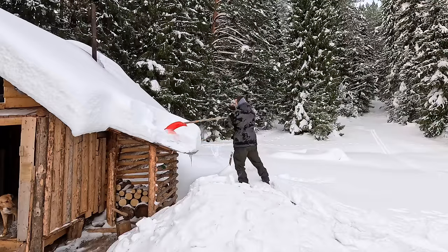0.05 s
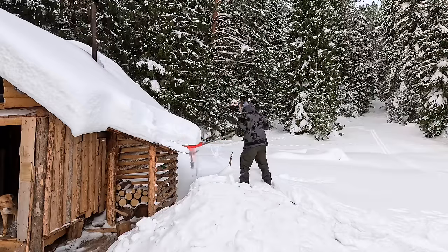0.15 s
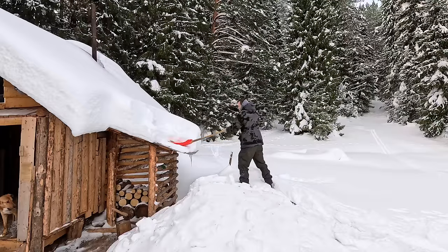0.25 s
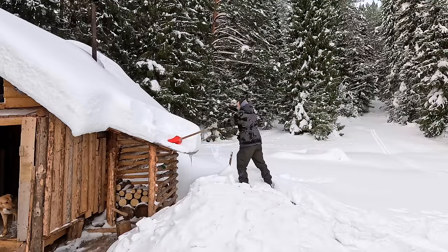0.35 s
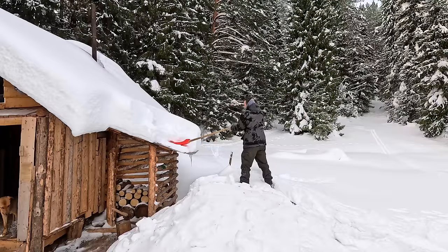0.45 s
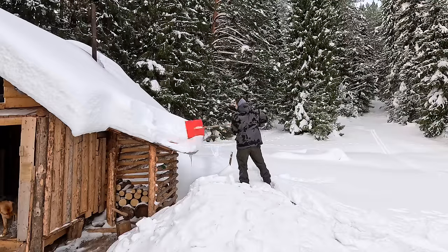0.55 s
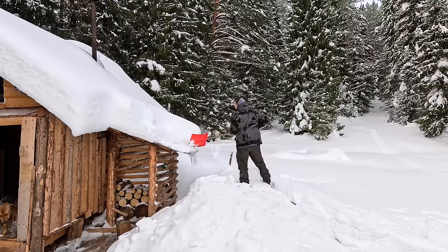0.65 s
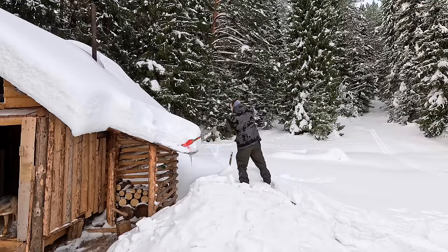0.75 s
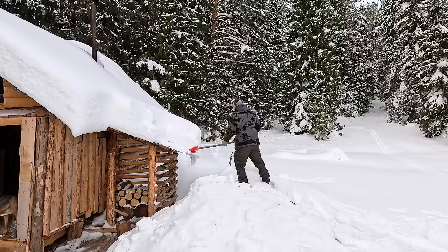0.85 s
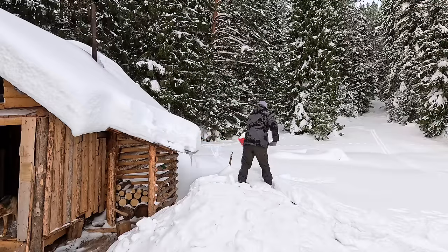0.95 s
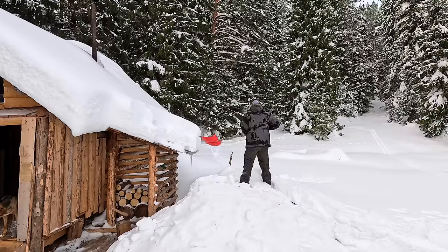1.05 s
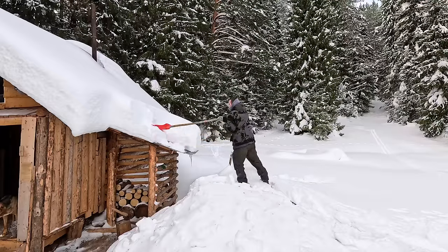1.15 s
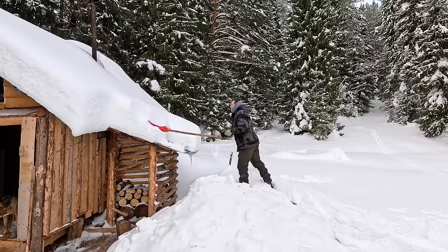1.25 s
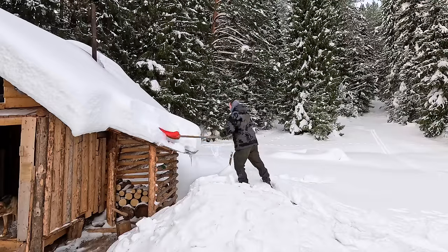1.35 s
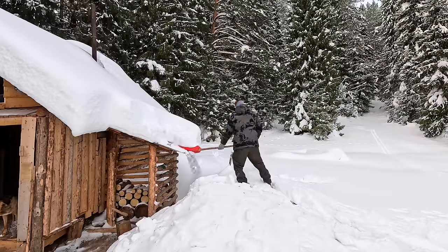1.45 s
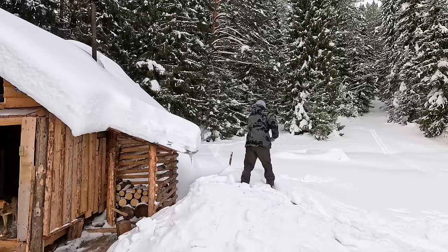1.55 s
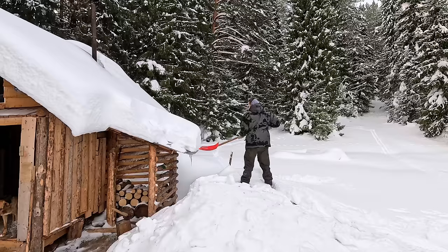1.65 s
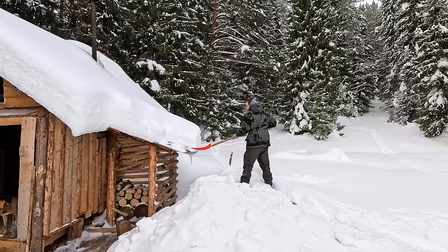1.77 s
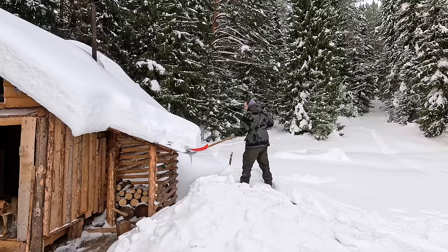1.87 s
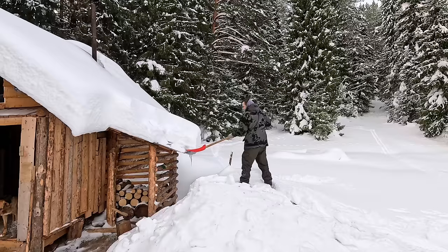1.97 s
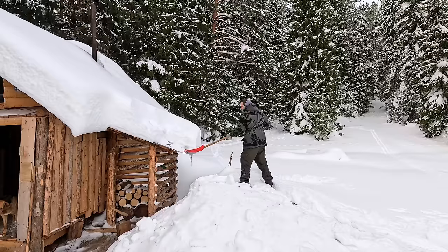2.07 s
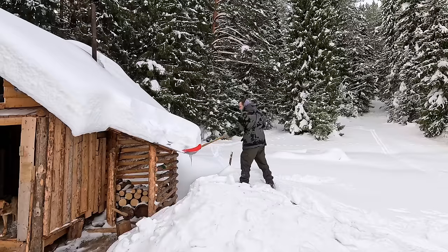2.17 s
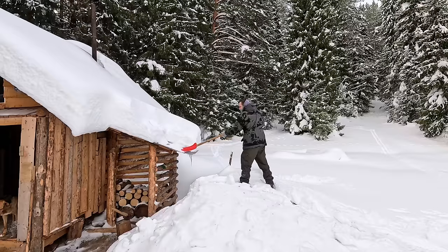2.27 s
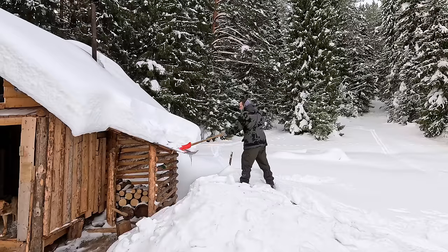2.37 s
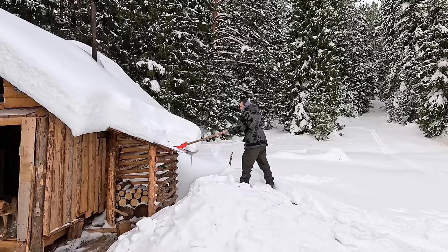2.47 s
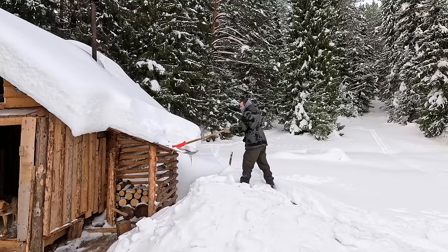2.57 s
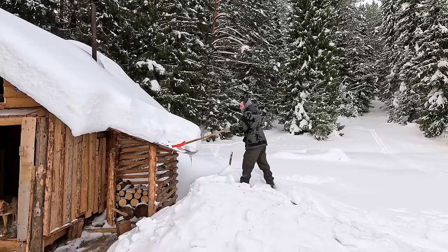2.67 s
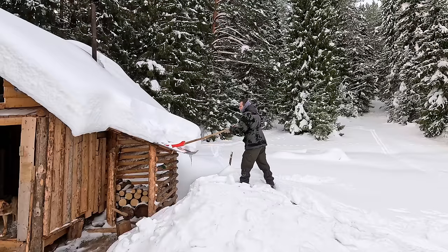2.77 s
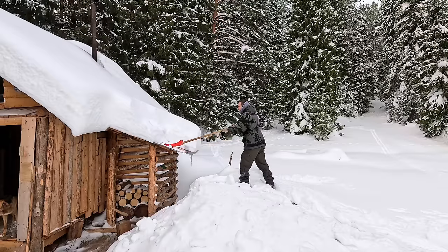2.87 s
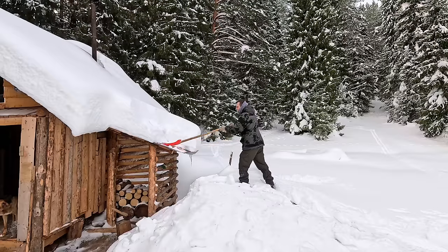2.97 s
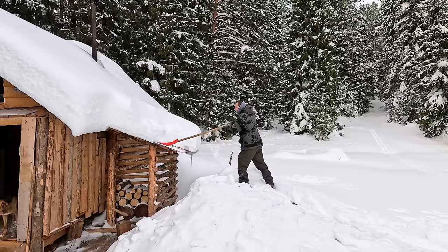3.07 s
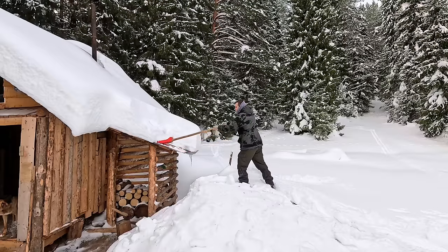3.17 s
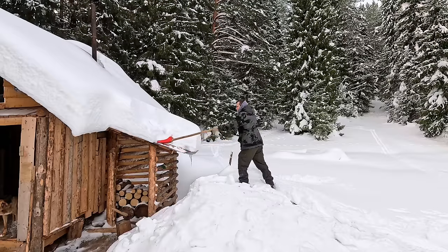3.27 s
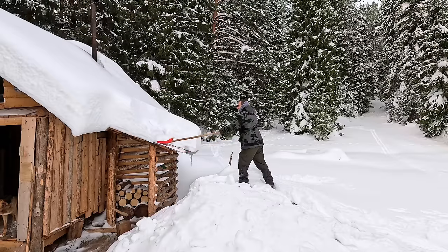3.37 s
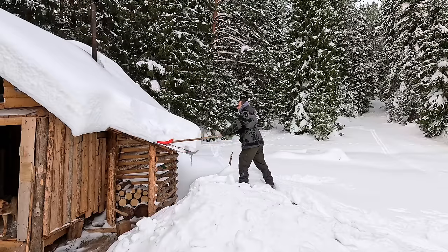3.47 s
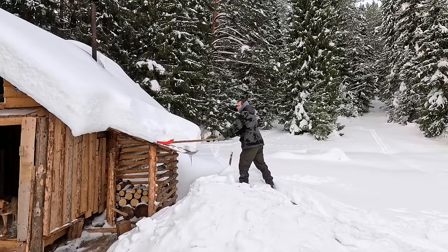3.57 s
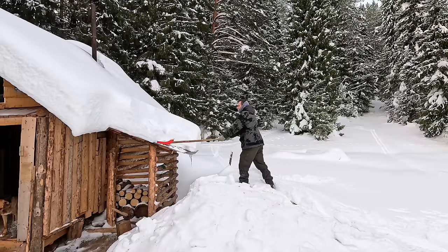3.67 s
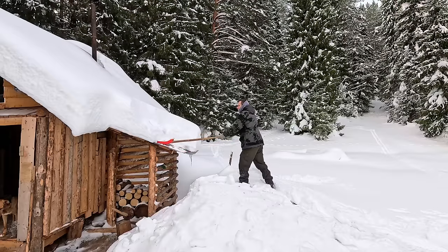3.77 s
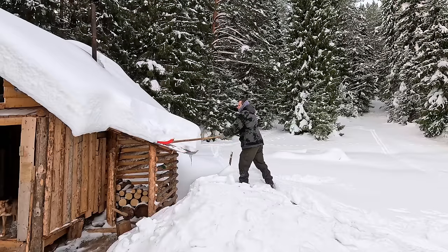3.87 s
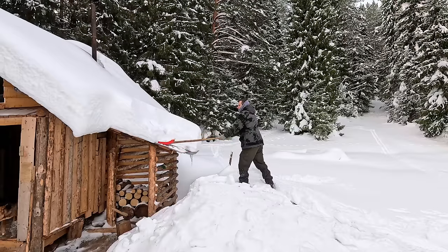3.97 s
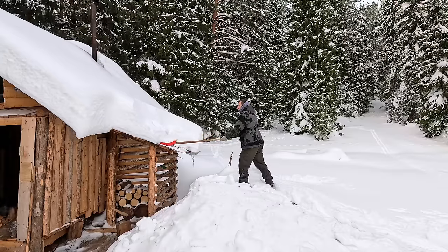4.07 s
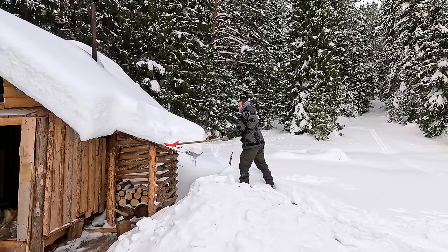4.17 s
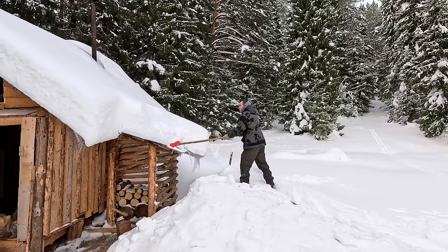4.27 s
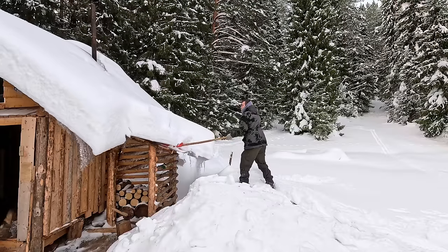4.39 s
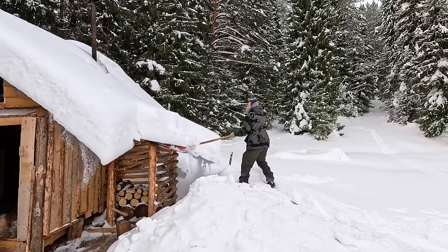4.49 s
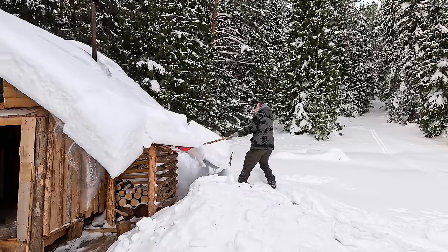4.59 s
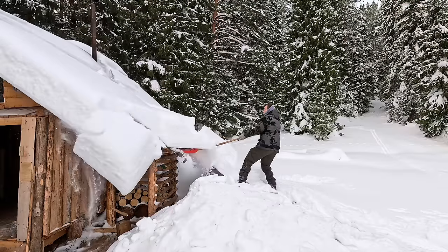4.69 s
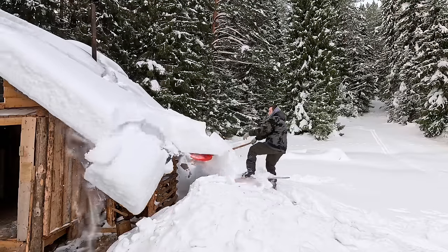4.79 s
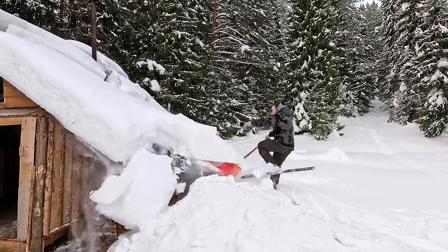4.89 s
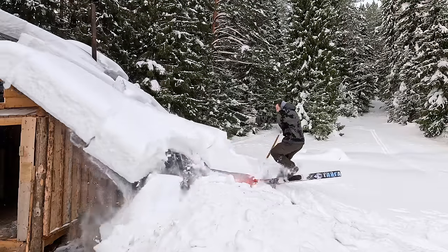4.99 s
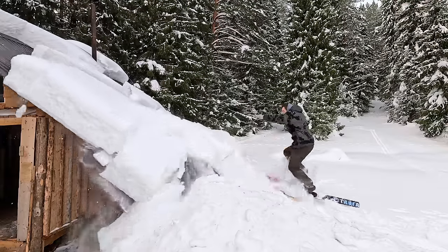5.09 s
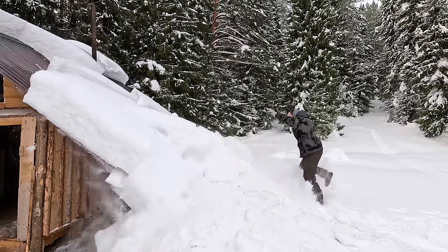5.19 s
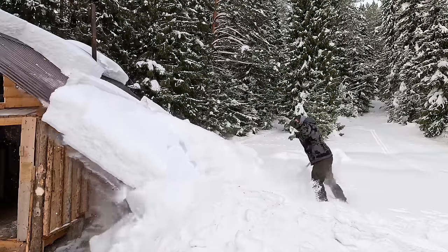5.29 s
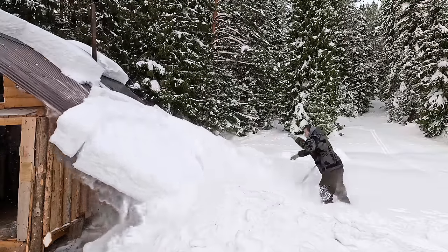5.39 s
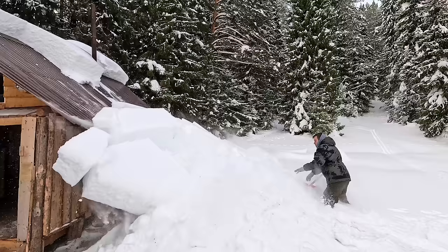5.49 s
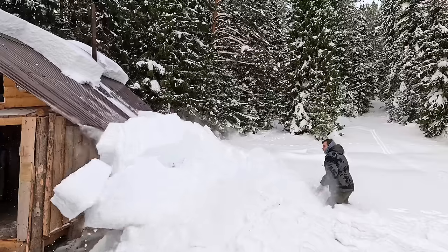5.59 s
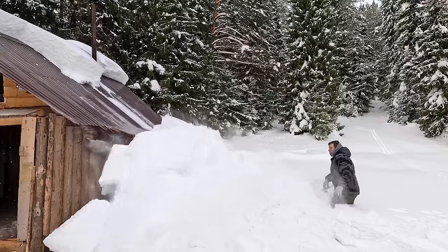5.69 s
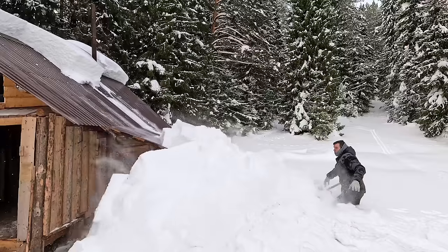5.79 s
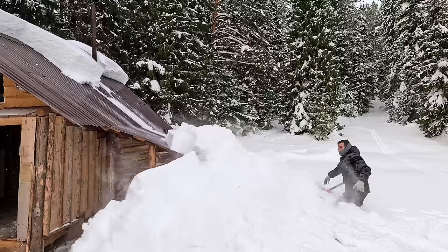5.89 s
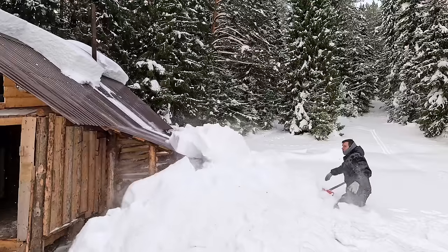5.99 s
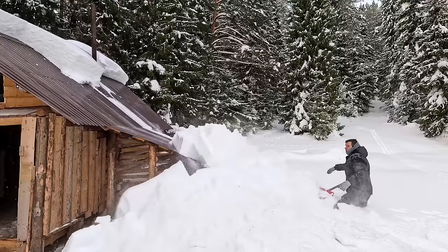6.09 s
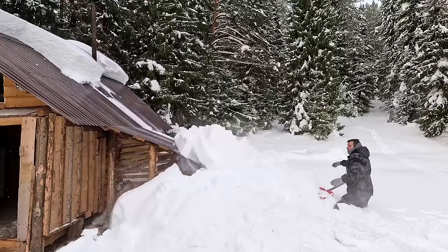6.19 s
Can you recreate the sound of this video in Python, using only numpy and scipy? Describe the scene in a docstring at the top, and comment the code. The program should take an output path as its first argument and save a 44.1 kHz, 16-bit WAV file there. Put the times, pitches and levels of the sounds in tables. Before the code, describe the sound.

Crisp shovel crunches in packed snow, a dull lump drop, long ringing metal scrapes, then a cracking slab rushes down the roof and thuds into the drift.

```python
"""On a cabin's eave in snowy woods, a shovel chops and rakes packed snow in short bright strokes: bursts of
crystal noise, over a fluttering background hiss that turns duller and quieter at 1.7 s. A lump drops dully on
the woodpile. The blade drags along the sheet metal in long ringing scrapes; cracks and rumbles break in as the
pack loosens. Then the slab rushes down the roof, as roaring and hissing noise, and its blocks thud onto the
drift as short low notes. There is no echo."""
import sys
import numpy as np
from scipy.fft import rfft, irfft, next_fast_len
from scipy.io import wavfile
from scipy.ndimage import uniform_filter1d, map_coordinates

SR = 44100
rng = np.random.default_rng(int(sys.argv[2]) if len(sys.argv) > 2 else 0)


def master_out(mix):
    """Clip the mix to full scale and print it as 16-bit PCM to the path in sys.argv[1]."""
    frames = np.transpose(np.atleast_2d(mix))
    ceiling = np.clip(frames, -1, 1)
    pcm = np.round(ceiling * 32767).astype(np.int16)
    wavfile.write(sys.argv[1], SR, pcm)


N = 275184  # length [samples]

# colour of hissing powder, in the slide and the cracks: (frequency [Hz], relative level [dB])
POWDER_HISS = [(1650, -4.5), (2800, 0.5), (3290, 1.5), (5530, 2.5), (7590, 0.5), (8430, -4.5),
               (12200, -12.0), (14200, -23.5), (15000, -43), (15700, -90)]


def amp(db):
    """Amplitude factor of a level in dB."""
    return 10 ** (np.asarray(db) / 20)


def unit(x):
    """Scale to rms 1."""
    return x / np.sqrt(np.mean(x ** 2) + 1e-20)


def along(points, hz):
    """Interpolate (frequency [Hz], value) points on a log frequency axis."""
    f, value = np.transpose(points)
    return np.interp(np.log(hz + 1), np.log(f + 1), value)


def curves(rows, fade):
    """A gate open while the rows last, then one curve per column, its steps eased over 10 ms; fade [s]."""
    times, *columns = np.transpose(rows)
    t = np.arange(N) / SR
    gate = np.clip(np.minimum(t - times[0], times[-1] + fade - t) / fade, 0, 1)
    eased = [uniform_filter1d(np.interp(t, times, c), size=SR // 100) for c in columns]
    return [gate] + eased


def wobble(rate):
    """A smooth random curve through rate knots a second."""
    knots = rng.standard_normal(int(N * rate / SR) + 4)
    return map_coordinates(knots, [np.arange(N) * rate / SR])


def filtered(x, response):
    """Multiply the spectrum of x by a response of frequency."""
    m = next_fast_len(N + SR // 2)
    hz = np.fft.rfftfreq(m, 1 / SR)
    return irfft(rfft(x, m) * response(hz), m)[..., :N]


def grit(spectrum, grain_db=0, flutter_db=0, modes=()):
    """Gritty noise: two streams, jointly rms 1, sharing 2 ms clumps and 40 ms flutter, then coloured."""
    clumps = amp(grain_db * wobble(500) + flutter_db * wobble(25))
    noise = clumps * rng.standard_normal((2, N))

    def colour(f):
        # each mode adds a resonant hump, 6 dB above its listed level
        ring = 1 + sum(amp(db + 6.0) / (1 + (2 * (f - c) / width) ** 2) for c, width, db in modes)
        return amp(along(spectrum, f)) * ring

    return unit(filtered(noise, colour))


def place(pair, spot):
    """Set a source before two microphones: stream one reaches both alike, stream two in opposite sign."""
    balance, alike = spot

    def mid_side(hz):
        turn = np.arccos(np.clip(along(alike, hz), 0, 1)) / 2
        return np.array([np.cos(turn), np.sin(turn)])

    mid, side = filtered(pair, mid_side)
    left_right = np.array([mid + side, mid - side])
    return filtered(left_right, lambda hz: amp(np.outer([.5, -.5], along(balance, hz))))


def burst(s, db, rise, t60):
    """A blow's envelope: quick rise [s], 60 dB of decay in t60 [s], cut off after half a second."""
    out, start = np.zeros(N), round(s * SR)
    t = np.arange(min(N - start, SR // 2)) / SR
    decay = amp(db - 60 * t / max(t60, .004))
    out[start:][:len(t)] = decay * (1 - np.exp(-t / max(rise, .0003)))
    return out


def strokes():
    """The blade rakes crust: coarse and fine crunch under a sparkle of crystals, each swelling and easing off."""
    # short rakes: (start [s], peak [s], end [s], crunch level at peak [dB], change from peak to end [dB],
    # sparkle over crunch [dB], fine over coarse crunch [dB])
    rakes = [(0.037, 0.039, 0.094, -46, -11.5, 5.5, 8), (0.108, 0.125, 0.15, -65, -5, 1, -6),
             (0.169, 0.159, 0.19, -52, -12, 7, -10), (0.194, 0.218, 0.235, -43.5, -2, 6.5, 9),
             (0.233, 0.241, 0.303, -45, -3, 1.5, 7.5), (0.301, 0.342, 0.35, -43.5, 1, -1, -3),
             (0.33, 0.395, 0.43, -45, -3.5, -1, 6), (0.44, 0.46, 0.47, -60, -2, 5, 3),
             (0.479, 0.485, 0.52, -59, -8, 10.5, 6), (0.52, 0.53, 0.552, -62.5, -7, 20.5, 11),
             (0.549, 0.558, 0.575, -55, -9, -3, 4), (0.607, 0.625, 0.65, -30, -14, 1, 9),
             (0.646, 0.656, 0.69, -52, -11, 8, 4), (0.701, 0.72, 0.737, -60, -13, 2.5, -4),
             (0.749, 0.752, 0.82, -58, -5.5, 13.5, 2), (0.776, 0.797, 0.847, -41, -16, 7, 14),
             (0.833, 0.9, 0.92, -48, 0, 9.5, 13), (0.922, 0.924, 0.975, -64, -6, 7, -4),
             (1.003, 1.004, 1.03, -73, -3, 15.5, 1), (1.184, 1.19, 1.246, -47.5, -12, 7, 0.5),
             (1.245, 1.245, 1.34, -64, -5, 7.5, 11), (1.307, 1.35, 1.41, -50.5, -4, 0, 24),
             (1.419, 1.44, 1.507, -52.5, -7, 10.5, 9), (1.505, 1.523, 1.58, -58.5, -9, 2, -1),
             (1.583, 1.586, 1.66, -71, -10, 9.5, 2)]
    # crunch colours, coarse then fine: (frequency [Hz], relative level [dB])
    coarse_colour, fine_colour = ([(500, -33), (1000, -16), (1400, -3), (2400, -1.5), (3400, -16),
                                  (6000, -59.5)], [(1500, -28), (2600, -8.5), (4000, -1.5), (6500, -6.5),
                                  (8500, -26), (12000, -73)])
    # crystal sparkle: (frequency [Hz], relative level [dB])
    sparkle_colour = [(3530, -24.5), (6000, -7), (8850, 2.5), (12800, 2.5), (14100, 1), (15600, 4),
                      (16300, -41.5)]
    lead_in_db = -15  # start of a rake, relative to its peak
    coarse, fine, sparkle = np.zeros((3, N))
    for s, peak, end, db, change_db, sparkle_db, fine_db in rakes:
        span = slice(round(s * SR) - 200, round(end * SR) + 800)
        t = np.arange(N)[span] / SR
        gate = np.clip(np.minimum((t - s) / 0.0071, (end - t) / 0.0076) + .5, 0, 1)
        level = gate * amp(db + np.interp(t, [s, peak, end], [lead_in_db, 0, change_db]))
        # coarse and fine share the crunch power
        finer = amp(fine_db)
        coarse[span] += level / np.hypot(1, finer)
        fine[span] += level * finer / np.hypot(1, finer)
        sparkle[span] += level * amp(sparkle_db)
    return (coarse * grit(coarse_colour, grain_db=4.0, flutter_db=3.5)
            + fine * grit(fine_colour, grain_db=2.5, flutter_db=5.0)
            + sparkle * grit(sparkle_colour, grain_db=2.0, flutter_db=2.2))


def blows():
    """Each blow sprays crystals, knocks the blade dully, rings it where it bites, and pushes the pack."""
    # blade blows: (time [s], spray level [dB], knock over spray [dB], thump over spray [dB], bite [Hz])
    hits = [(0.0356, -24, -13, -8, 1596), (0.155, -22.5, -30, -13, 2160), (0.179, -46.5, -2, -7, 1380),
            (0.2204, -20, -15, -18, 660), (0.255, -32, -15, -39, 1500), (0.3351, -20, -1.5, -16, 600),
            (0.371, -45.5, -6.5, -30, 764), (0.381, -44, -5, -30, 900), (0.4344, -45.5, -12, -20, 694),
            (0.75, -41.5, -18, -20, 1440), (0.7846, -37.5, -1, -9, 1400), (0.8942, -37.5, -7, -6, 2400),
            (0.9177, -31, -2.5, -32, 1120), (1.0394, -54, 4, 6, 589), (1.191, -38.5, -23, -15, 2150),
            (1.2022, -32.5, -20, -26, 1240), (1.4431, -20, -29, -47, 663)]
    # crumbs dropping softly: (time [s], level [dB])
    crumbs = [(0.084, -65), (0.759, -57), (1.059, -64), (1.079, -57), (1.129, -57), (1.615, -50),
              (1.719, -65)]
    # resonances of the struck blade: (frequency [Hz], width [Hz], level before grit's added 6 dB [dB])
    knock_modes = [(543, 160, 9), (2240, 300, -6), (4100, 400, -7.5)]
    bite_db = -1.5  # over spray
    t = np.arange(N) / SR
    spray = sum(burst(s, db, 0.0014, 0.026) for s, db, *_ in hits)
    knock = sum(burst(s, db + knock_db, 0.0045, 0.033) for s, db, knock_db, *_ in hits)
    bite = sum(burst(s, db + bite_db, 0.0024, 0.024) * np.sin(2 * np.pi * hz * (t - s))
               for s, db, _, _, hz in hits)
    push = sum(burst(s, db + thump_db, 0.007, 0.053) for s, db, _, thump_db, _ in hits)
    # crumbs land with the same low colour
    push = push + sum(burst(s, db, 0.0028, 0.028) for s, db in crumbs)
    spray_colour = [(300, -16.0), (900, -5.0), (2500, -1.5), (6000, -5.5), (15000, -5), (16500, -27)]
    knock_colour = [(150, -47.0), (350, -12.0), (900, 6), (2500, -13.0), (5000, -18), (8000, -54)]
    push_colour = [(25, -35), (70, -5.0), (160, -3.0), (350, -5.0), (700, -50)]
    return (spray * grit(spray_colour, grain_db=0.5)
            + knock * grit(knock_colour, modes=knock_modes)
            + push * grit(push_colour, modes=[(186, 87, 4)])
            + [bite, np.zeros(N)])


def ticks():
    """A crust grain snaps: a fast-dying sine of a cycle or two, with a noisy bright edge and no bass."""
    # single snaps: (time [s], level before the 3.5 dB lift below [dB], centre [Hz])
    snaps = [(0.125, -46, 3220), (0.1391, -47, 2330), (0.148, -40, 2900), (0.308, -40, 2230),
             (0.3122, -39, 2090), (0.463, -50, 3600), (0.6512, -29, 3100), (0.7217, -43, 2610),
             (0.957, -47.5, 2760), (0.971, -48, 3180), (1.03, -51, 3240), (1.1478, -40.5, 1810),
             (1.155, -35.5, 1920), (1.3091, -40, 2010), (1.505, -38.5, 5380), (1.549, -39, 2440),
             (1.5594, -41, 3210), (1.6324, -42, 2775), (1.6964, -40, 2140)]
    out, t = np.zeros(N + SR), np.arange(SR // 100) / SR
    for s, db, hz in snaps:
        snap = np.sin(2 * np.pi * hz * t) * np.exp(-1.3 * hz * t)
        edge = 0.16 * rng.standard_normal(len(t)) * amp(-60 * t / 0.0022)
        out[round(s * SR):][:len(t)] += amp(db + 3.5) * (snap + edge)
    no_bass = lambda f: (1j * f / (450 + 1j * f)) ** 2  # high-pass, 450 Hz
    return np.array([filtered(out[:N], no_bass), np.zeros(N)])


def drags():
    """Friction rings the blade; as snow loads it, it rings less and shakes the roof sheet harder."""
    # three long drags, a list each: (time [s], blade level [dB], hiss over blade [dB])
    pulls = [
        [(2.03, -84, -3), (2.072, -55, -11), (2.156, -43.5, -7), (2.344, -41.5, -5.5), (2.374, -35, -7.5),
         (2.518, -42.5, -1.5), (2.548, -33, -12), (2.6, -41, -2), (2.662, -41, -7.5), (2.764, -54.5, -7),
         (2.775, -50, 7)],
        [(2.775, -63, -3.5), (2.811, -43.5, -8), (2.829, -46.5, -4), (2.857, -39.5, -5.5), (3.043, -34, -4),
         (3.057, -33, -8), (3.083, -36, -3), (3.213, -30, -2.5), (3.239, -31, -3.5), (3.325, -39.5, -10.5),
         (3.35, -49, -6)],
        [(3.35, -39.5, -7), (3.4, -45.5, -3.5), (3.44, -40.5, -2), (3.48, -41.5, 1), (3.55, -48.5, -3),
         (3.575, -41.5, -0.5), (3.64, -45.5, -2.5), (3.67, -41.5, -1), (3.75, -43.5, -1.5), (3.81, -52, -11),
         (3.85, -43, 1)],
    ]
    # how free the blade is to ring: (time [s], share [0-1])
    freedom = [(2.05, 1.0), (2.45, 0.87), (2.7, 0.8), (3.0, 0.34), (3.9, 0.33)]
    # resonances of the dragged blade: (frequency [Hz], width [Hz], level before grit's added 6 dB [dB])
    blade_modes = [(1120, 80, -7.5), (1550, 220, 2.5), (2560, 410, 2)]
    # scraping blade: (frequency [Hz], relative level [dB])
    scrape_colour = [(260, -25.5), (450, -16.5), (728, -4.5), (941, 3.5), (1300, 2), (1540, -0.5),
                     (1970, -0.5), (3500, -16.5), (4550, -45), (7700, -120)]
    # hiss under the blade: (frequency [Hz], relative level [dB])
    hiss_colour = [(1650, -43), (2800, -2.0), (4850, -3.5), (7270, -4.5), (8240, -10.5), (9880, -10.5),
                   (12000, -17), (13900, -26), (14800, -41), (15400, -90)]
    # shaken roof sheet: (frequency [Hz], relative level [dB])
    sheet_colour = [(82, -73), (140, -14), (168, -2.5), (215, -3), (440, 2.5), (700, 1.5), (910, -14),
                    (1540, -120)]
    sheet_db, sheet_loaded_db = -18.5, 21  # sheet over a free blade; gain at no freedom to ring
    gate, blade_db, hiss_db = curves(np.concatenate(pulls), fade=0.023)
    free = np.clip(np.interp(np.arange(N) / SR, *np.transpose(freedom)), 0, 1)
    ringing = grit(scrape_colour, grain_db=2.0, flutter_db=1.1, modes=blade_modes)
    damped = grit(scrape_colour, grain_db=1.0, flutter_db=-1.0)
    blade = np.sqrt(free) * ringing + np.sqrt(1 - free) * damped
    hiss = amp(hiss_db) * grit(hiss_colour, grain_db=1.3, flutter_db=1.75)
    sheet_level = amp(sheet_db + sheet_loaded_db * (1 - free))
    sheet = sheet_level * grit(sheet_colour, grain_db=2.0, flutter_db=1.0)
    return gate * amp(blade_db) * (blade + hiss + sheet)


def spits():
    """Ice chips spit off the sheet: very short, thin bursts of high noise."""
    # chips: (time [s], level before the 1 dB lift below [dB])
    chips = [(3.4148, -32), (3.4722, -32), (3.479, -30)]
    thin = [(2500, -50), (5000, -5), (10000, 2), (14000, -8), (15000, -80)]
    return sum(burst(s, db + 1, 0.0003, .008) for s, db in chips) * grit(thin)


def slide():
    """The slab roars on the ribbed sheet, hisses as powder, tumbles in lumps and booms in the drift."""
    # slab on the roof: (time [s], roof level [dB], hiss over roof [dB])
    rush = [(3.86, -45, -3), (3.91, -33, -8), (4.02, -26.5, -2), (4.21, -28, -1.5), (4.3, -24, -1),
            (4.39, -27, -1), (4.5, -26.5, -1.5), (4.6, -27, -0.1), (4.73, -24, -0.3), (4.99, -27, 0),
            (5.13, -24.5, 0), (5.3, -30, 1.5), (5.46, -27.5, 1), (5.63, -26.5, -2.5), (5.71, -29.5, -3),
            (5.85, -35.5, 1), (5.93, -33.5, 2), (5.95, -30.5, 1.5), (6.04, -27.5, -2.5), (6.18, -32.5, 0),
            (6.24, -27.5, -10)]
    # snow falling into the drift: (time [s], tumbling level [dB], ground boom level [dB])
    landing = [(3.86, -47, -50), (3.97, -28, -40), (4.12, -44.5, -47), (4.3, -31.5, -38),
               (4.52, -34.5, -37.5), (4.61, -30.5, -50), (4.69, -31.5, -30), (4.82, -26.5, -35),
               (4.99, -37, -26), (5.13, -24.5, -27.5), (5.3, -34.5, -29), (5.37, -41.5, -39.5),
               (5.46, -36, -27), (5.55, -29.5, -29.5), (5.63, -24, -29), (5.72, -28.5, -26.5),
               (5.85, -41, -29.5), (5.93, -38, -39), (6.02, -33.5, -37), (6.17, -37, -36.5),
               (6.24, -22.5, -27)]
    # roaring roof: (frequency [Hz], relative level [dB])
    roof_colour = [(260, -16.5), (450, -4), (736, -2.5), (854, -3.5), (950, 2), (1210, -1.5), (1580, -0.5),
                   (1800, -3.5), (3200, -11.5), (4160, -79), (7040, -120)]
    # tumbling lumps: (frequency [Hz], relative level [dB])
    tumble_colour = [(53, -33), (90, -3.5), (167, -1.5), (199, -2.5), (296, -2), (397, -9.5), (600, -11),
                     (780, -53), (1320, -120)]
    # ground boom: (frequency [Hz], relative level [dB])
    boom_colour = [(8.8, -30), (15, 4.5), (32, 6), (130, 0.5), (170, -6), (290, -120)]
    gate, roof_db, hiss_db = curves(rush, fade=0.062)
    _, tumble_db, boom_db = curves(landing, fade=0.041)
    roof = amp(roof_db) * grit(roof_colour, grain_db=0.1, flutter_db=0.95)
    hiss = amp(roof_db + hiss_db) * grit(POWDER_HISS, grain_db=0.67, flutter_db=0.76)
    tumble = amp(tumble_db) * grit(tumble_colour, grain_db=2.0, flutter_db=1.5)
    boom = amp(boom_db) * grit(boom_colour, grain_db=-2.5, flutter_db=2.0)
    return gate * (roof + hiss + tumble + boom)


def cracks():
    """A crack in the slab or a lump landing: a rough burst on the roof, a low thump and a puff of powder."""
    # cracks and lumps: (time [s], level [dB], thump over level [dB], hiss over level [dB], t60 [s]);
    # each part is trimmed further below, and the thump decays longer
    breaks = [(2.806, -54, -32, -14, 0.1), (3.412, -25.5, -13, -8, 0.093), (3.755, -17, -13.5, -12.5, 0.17),
              (3.864, -12.5, -9, -14, 0.13), (3.907, -7.5, -23, -19, 0.22), (3.95, -6, -16, -19, 0.18),
              (3.981, -14.5, -19, -30, 0.11), (6.197, -18.5, 3, -2.5, 0.12)]
    roof = sum(burst(s, db - 11, 0.00063, t60) for s, db, _, _, t60 in breaks)
    thump = sum(burst(s, db + low_db - 7.5, 0.016, 1.56 * t60) for s, db, low_db, _, t60 in breaks)
    puff = sum(burst(s, db + hiss_db - 2.5, 0.0045, t60) for s, db, _, hiss_db, t60 in breaks)
    roof_colour = [(150, -30), (350, 4.0), (1000, 8.0), (1800, 1.5), (3500, -8.5), (7000, -36), (12000, -120)]
    thump_colour = [(25, -21), (70, -5.0), (170, -21), (350, -13), (600, -48), (1200, -120)]
    return (roof * grit(roof_colour)
            + thump * grit(thump_colour, modes=[(177, 31, 0)])
            + puff * grit(POWDER_HISS))


def thuds():
    """A big block lands in the drift: a soft, short low sine."""
    # blocks: (time [s], level [dB], frequency [Hz], t60 [s])
    blocks = [(4.821, -20, 96.2, 0.27), (4.86, -21.5, 149.3, 0.38), (4.955, -19.5, 40.8, 0.29),
              (5.103, -17.5, 116.7, 0.29), (5.49, -17, 39.8, 0.21), (5.595, -12, 172, 0.29),
              (5.609, -17.5, 29.5, 0.47), (6.196, -14.5, 89.5, .4)]
    t = np.arange(N) / SR
    notes = sum(burst(s, db, 0.0073, t60) * np.sin(2 * np.pi * hz * (t - s)) for s, db, hz, t60 in blocks)
    return np.array([notes, np.zeros(N)])


def shift():
    """The loosening pack rumbles in the rafters: low, strongly fluttering noise."""
    # pack shifting on the roof: (time [s], rumble level [dB])
    rumbles = [(2.9, -75), (2.996, -57.5), (3.17, -62), (3.264, -47), (3.436, -54), (3.54, -71),
               (3.585, -45), (3.62, -46), (3.678, -62), (3.76, -42), (3.808, -60), (3.9, -50)]
    # rafters: (frequency [Hz], relative level [dB])
    rafter_colour = [(18, -51), (30, -28), (85, -1.5), (105, 1), (130, -14), (170, -5), (220, -24),
                     (370, -120)]
    gate, rumble_db = curves(rumbles, fade=0.036)
    return gate * amp(rumble_db) * grit(rafter_colour, grain_db=3.0, flutter_db=5.5)


def lump():
    """A lump drops on the woodpile: a dull tap, a rough thump and the rustle of settling snow."""
    # one row of levels: (tap [dB], thump [dB], settling rustle [dB])
    tap_db, thump_db, rustle_db = [-43.5, -36.5, -74]
    s = 1.786  # landing time [s]
    tap_colour = [(200, -20), (500, 3), (1500, -4), (2800, -22), (4500, -60)]
    thump_colour = [(25, -29.0), (70, 4), (250, -5), (450, -18), (800, -54)]
    rustle_colour = [(100, -21), (300, -13), (1500, -8), (3000, -32)]
    tap = burst(s, tap_db, 0.00064, 0.021) * grit(tap_colour)
    thump = burst(s, thump_db, 0.004, 0.079) * grit(thump_colour)
    rustle = burst(s, rustle_db, 0.018, 0.86) * grit(rustle_colour)
    return tap + thump + rustle


def background():
    """A brighter, fluttering background hiss until 1.7 s, then a duller, quieter one."""
    # brighter hiss: (frequency [Hz], relative level [dB])
    bright_colour = [(35, -42), (60, -11.5), (456, -14), (962, -21.5), (1610, -3.5), (2750, -8.5),
                     (7670, -16.5), (11400, -10.5), (14400, -11), (15800, -13)]
    # duller hiss: (frequency [Hz], relative level [dB])
    dull_colour = [(24, -52), (40, -24), (113, -12), (277, -8.5), (313, -16), (345, -12), (559, -18.0),
                   (7630, -31), (13000, -33.0), (14500, -80)]
    bright_db, dull_db = -66.5, -75
    early = np.clip((1.7 - np.arange(N) / SR) / .01, 0, 1)
    bright = amp(bright_db) * grit(bright_colour, flutter_db=6.0)
    dull = amp(dull_db) * grit(dull_colour)
    return early * bright + (1 - early) * dull


def scene():
    """Strokes, drags and slide each come from their own spot, with the background spread wide around them."""
    # each spot holds two tables: (frequency [Hz], left over right [dB])
    # and (frequency [Hz], likeness of left and right [0-1])
    # where the strokes fall
    near = ([(60, -1.5), (240, -1.0), (950, -0.34), (3770, -1.0), (15000, -1.0)], [(60, 0.9), (240, 0.98),
             (950, 1), (3770, 1), (15000, 0.98)])
    # where the blade drags; same columns
    eave = ([(60, -0.5), (180, -0.7), (550, -1.9), (1650, -0.33), (4970, -0.36), (15000, 1)], [(60, 0.65),
             (180, 0.97), (550, 0.99), (1650, 0.98), (4970, 0.99), (15000, 0.99)])
    # where the slab slides; same columns
    slope = ([(100, -.2), (640, 0), (1400, .3), (3100, 2), (6800, 2.4), (12000, 1.5), (15000, .3)],
              [(100, .998), (300, .99), (640, .97), (1400, .985), (2200, .95), (3500, .97), (5000, .99),
              (9000, .985), (12000, .86), (14000, .8)])
    wide = [(100, -.6), (9000, -.6)], [(100, 0.65), (9000, 0.68)]
    return (place(strokes() + blows() + ticks() + lump(), near)
            + place(drags() + spits(), eave)
            + place(slide() + cracks() + thuds() + shift(), slope)
            + place(background(), wide))


def record(dry):
    """Nothing sounds from 16.1 kHz up."""
    return filtered(dry, lambda hz: hz < 16100)


dry = scene()
out = record(dry)
master_out(out)
```